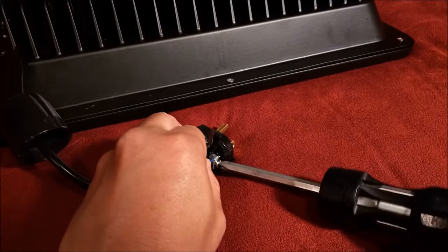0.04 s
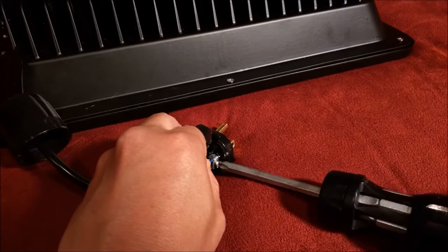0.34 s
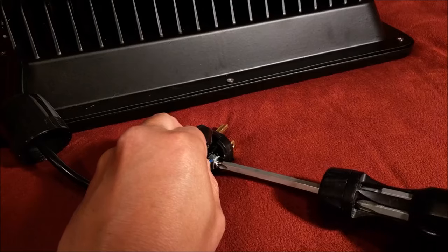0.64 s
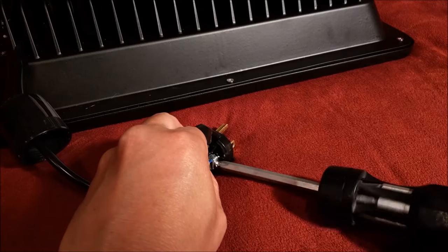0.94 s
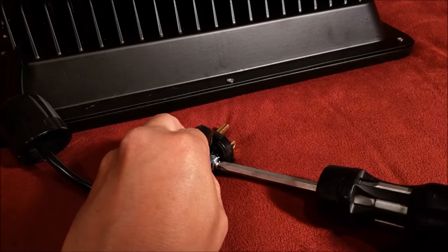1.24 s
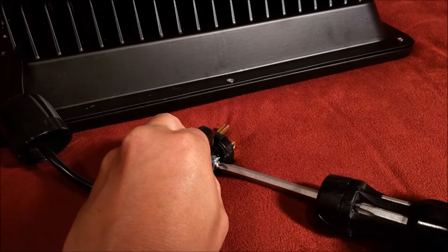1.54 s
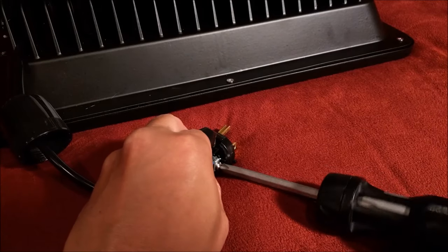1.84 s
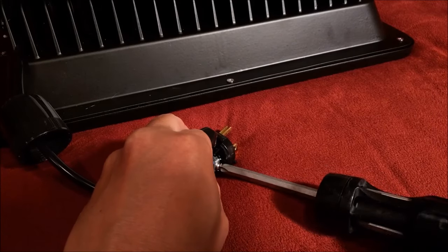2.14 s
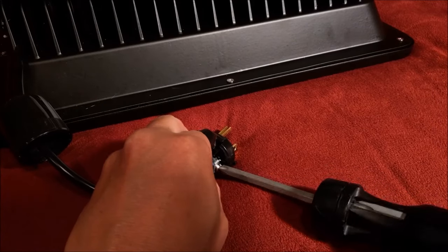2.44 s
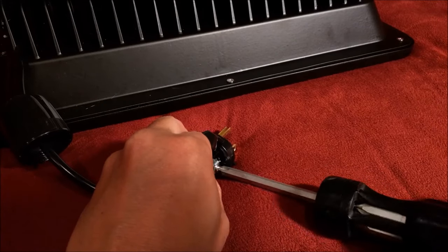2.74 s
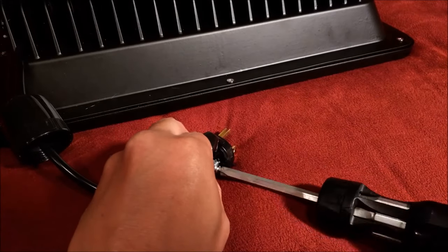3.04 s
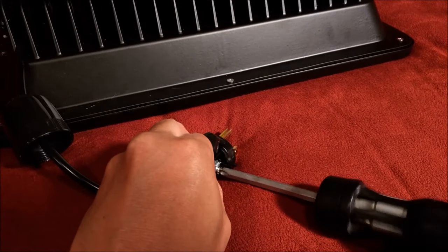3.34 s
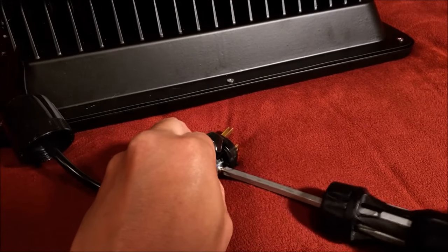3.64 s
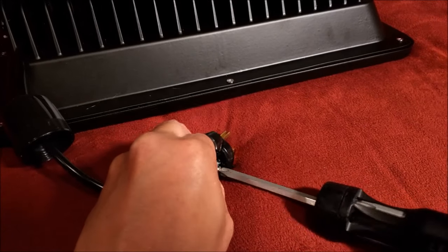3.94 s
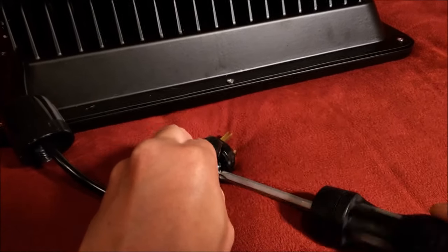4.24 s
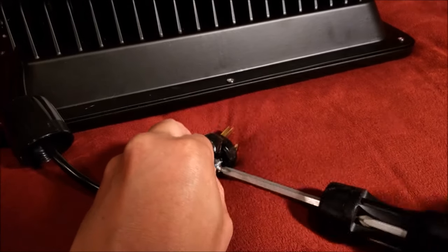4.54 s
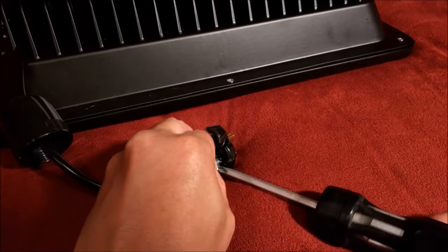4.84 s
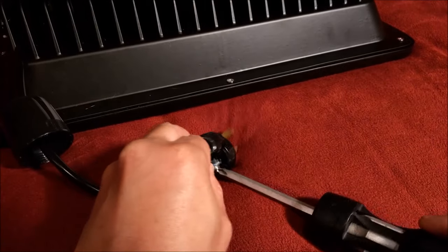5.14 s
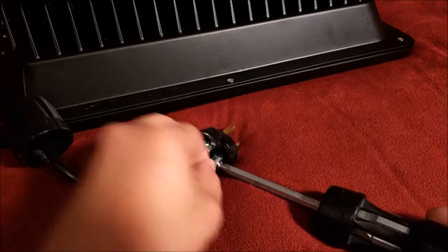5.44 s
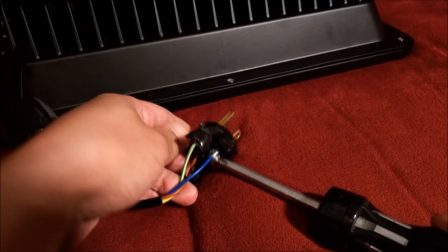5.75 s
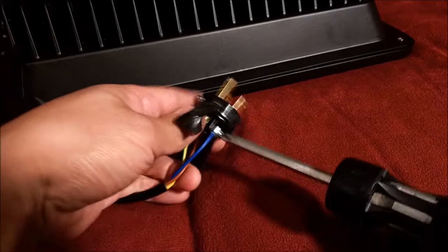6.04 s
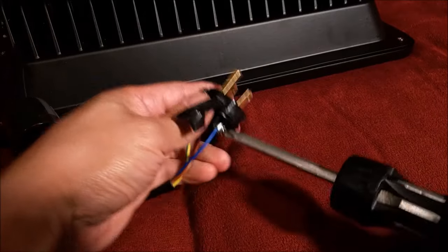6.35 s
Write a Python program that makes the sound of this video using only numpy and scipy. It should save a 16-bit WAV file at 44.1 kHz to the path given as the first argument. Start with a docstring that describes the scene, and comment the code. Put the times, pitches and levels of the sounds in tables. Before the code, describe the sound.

Clusters of small, sharp ticks as a screwdriver slips in an electrical plug's screw, with dull hand bumps in a quiet room.

```python
"""A small quiet room, a blanket-covered table: close up, a screwdriver works a plastic plug's terminal screw.
The blade knocks and slips in the slot: clusters of dry clicks from the shell, with a faint ring of steel. The
turning hand bumps the table four times, two of the bumps knocking again on the rebound; fingers pat and rub,
and the thread squeaks thinly. Low rumble and steady hiss lie underneath."""
import sys
import numpy as np
from scipy import signal
from scipy.fft import rfft, irfft
from scipy.io import wavfile
from scipy.ndimage import uniform_filter1d

SR = 44100
rng = np.random.default_rng(int(sys.argv[2]) if len(sys.argv) > 2 else 0)


def store_wav(level_fs):
    """Save 16-bit WAV to argv[1]."""
    pcm = np.round(np.clip(np.atleast_2d(level_fs), -1, 1) * 32767)
    wavfile.write(sys.argv[1], SR, pcm.T.astype(np.int16))


N = 281358
TIME = np.arange(N) / SR


# blade knocks in the slot: t/s, level/dB, hardness/dB, chatter t60/s, favoured f/Hz
BLADE_KNOCKS = [(.0447, -49, -2, 0.021, 4230), (0.1178, -53.5, 0, .024, 1560), (0.124, -54, -5, .014, 3960),
                (0.1358, -39, 1.5, 0.014, 7500), (0.2254, -51.5, -18, 0.011, 4100),
                (0.2314, -52, -16, 0.028, 4150), (.652, -51, -11, .015, 2380),
                (.664, -40.5, -4, .022, 6140), (1.1732, -48, 6.5, 0.026, 4400),
                (1.5838, -48, -8, 0.014, 2400), (1.5877, -40.5, -3, 0.021, 6340),
                (1.6734, -62, -1, 0.019, 1570), (1.8138, -71, -7, .01, 1650),
                (1.8906, -70.5, -2, 0.017, 1620), (1.977, -64, -6, 0.023, 1600), (2.146, -74, 0, .02, 1740),
                (2.2606, -71, -4, .04, 1500), (2.6357, -62, -6, 0.017, 3190), (2.6613, -42, 4, 0.025, 7560),
                (2.6706, -40.5, 5, 0.019, 4200), (2.7172, -52, 2, 0.02, 4200),
                (2.7789, -54.5, 1, 0.041, 1880), (2.8667, -48, -1, .017, 5300),
                (2.9456, -52, -1, .029, 7500), (2.965, -59.5, -3, .02, 1470),
                (3.0847, -65.5, 3.5, .04, 1650), (3.0932, -50.5, 5, 0.022, 3930),
                (3.1783, -48, 14.5, 0.0091, 10900), (3.2159, -53.5, -3, 0.012, 2320),
                (3.2528, -53, 3.5, 0.014, 3940), (3.3267, -61.5, 7, 0.027, 2200),
                (3.361, -61, 2, 0.023, 1570), (3.3737, -37, 4.5, 0.015, 6800),
                (3.3797, -39, 0, 0.018, 4200), (3.4141, -44.5, 1.5, 0.032, 4370),
                (3.4392, -55, -1, .02, 3900), (3.4526, -45.5, -16, .014, 4300),
                (3.6019, -44.5, -3, 0.012, 2520), (3.6256, -57, -12, .01, 1660),
                (3.714, -57, 0, 0.024, 2350), (3.8112, -49, -8, 0.014, 4100),
                (3.8731, -59.5, -8, 0.018, 2450), (3.987, -57.5, -2, .03, 2320),
                (3.9986, -57, -11, .016, 2340), (4.0103, -51.5, -16, 0.0097, 1670),
                (4.184, -62.5, 9, .03, 2490), (4.2197, -46, -1.5, 0.023, 3360),
                (4.2733, -60.5, -13, .02, 2500), (4.3404, -56, 6, .022, 5900),
                (4.4305, -46, 2, 0.025, 2404), (4.5192, -48, -1, 0.0087, 6300),
                (4.6, -69, -18, 0.034, 1728), (4.6699, -56.5, 5, .014, 2990),
                (4.6985, -52, -12, .021, 2380), (4.7219, -49, -15, .027, 1570),
                (4.7438, -53, -8, .036, 2400), (4.7483, -41.5, 3, 0.029, 4170),
                (4.8148, -56.5, 10.5, 0.018, 6040), (4.9753, -62, 0, .014, 1810),
                (4.9851, -46, 0, .018, 4940), (5.2177, -52, -17, .014, 2480),
                (5.2367, -51.5, 4, 0.033, 2480), (5.2432, -44, 1, 0.023, 4200),
                (5.3101, -56, 6.5, .012, 6200), (5.3244, -57, -5, .012, 4200),
                (5.619, -63.5, -2, 0.048, 3050), (6.1146, -76.5, 38, 0.0054, 12500)]
# turns of the screw: start/s, end/s
SCREW_TURNS = [(1.6, 1.65), (3.051, 3.43), (3.68, 3.85), (4.03, 4.35), (4.52, 5.1)]
def screwdriver(rebound_s=.008, rebound_db=-13):
    """The blade knocks and drops back into the slot; the turning thread ticks faintly at random."""
    out = np.zeros(N)
    for s, db, *contact in BLADE_KNOCKS:
        add(out, s, knock(db, *contact))
        delay = rebound_s * np.exp(.25 * rng.normal())
        add(out, s + delay, knock(db + rebound_db, *contact))
    for start, end in SCREW_TURNS:
        for s in scatter(start, end, per_s=16):
            add(out, s, knock(db=rng.normal(-68.5, 2), hardness_db=0, t60=.019, favoured_hz=1680))
    return out


def knock(db, hardness_db, t60, favoured_hz, body_hz=2600, edge_hz=7500):
    """One slip: a snap and brief chatter drive the shell, and the steel rings on."""
    t = np.arange(SR // 4) / SR
    force = grainy_noise(len(t), spread_db=3) * fade(t, t60)
    force[0] += 1.93  # the snap
    force *= 1 - .46 * np.exp(-t / .00054)  # slightly softened attack
    shell = plug_shell(force, favoured_hz)
    body = band(shell, body_hz, "lowpass", order=4)
    # the small plug radiates little bass
    body = band(body, 730, "highpass", order=4) + undb(-6) * band(body, [200, 400], "bandpass")
    middle = band(shell, [body_hz, edge_hz], "bandpass", order=4)
    edge = band(shell, edge_hz, "highpass", order=4)
    # gentle or low contacts are mostly body; hard ones lift the top edge
    body_db = -1 + .2182 * (-50 - db) + 3.5 * np.log2(4000 / favoured_hz)
    layers = (body, body_db), (middle, 0), (edge, hardness_db - 10)
    attack = SR // 250  # the layers are balanced over their first 4 ms
    click = sum(undb(layer_db) * layer / np.std(layer[:attack]) for layer, layer_db in layers)
    return undb(db) * (click + steel_ring(t, favoured_hz))


# damped modes of the gripped plug and handle: f/Hz, width/Hz, level/dB
SHELL_MODES = [(302, 310, 3), (830, 350, -5), (1167, 470, 1), (1545, 440, 0), (1720, 320, -3.5),
               (2496, 236, -3), (3190, 710, 1), (3875, 210, 1), (4140, 250, 5), (5000, 920, -3),
               (6240, 260, -3), (6720, 106, -0.5), (7440, 1550, -3.5), (8810, 750, -2), (9830, 1200, -4.5),
               (10300, 800, -7), (12560, 490, -13.5), (12400, 570, -8)]
def plug_shell(force, favoured_hz, crack_db=-21):
    """The plastic colours the raw crack with short resonances, a little different on every hit."""
    out = undb(crack_db) * force
    for hz, width, db in SHELL_MODES:
        gain = undb(db + 10 * nearness(hz, favoured_hz) + 3 * rng.normal())
        out += gain * resonate(force, hz * rng.normal(1, .0077), width)
    return out


# modes of the steel blade and brass pins: f/Hz, level/dB, t60/s
METAL_MODES = [(2465, -26, .03), (3530, -37, .12), (3930, -29, .09), (4190, -23, .08), (5380, -32, .12),
               (6270, -23, .08), (6340, -30, .24), (7350, -26, .15), (12480, -34, .07), (13150, -28, .09),
               (13780, -32, .14)]
def steel_ring(t, favoured_hz, ring_db=-1.5):
    """Struck metal leaves a faint tail of decaying sines."""
    out = np.zeros(len(t))
    for hz, db, t60 in METAL_MODES:
        gain = undb(ring_db + db + 9 * nearness(hz, favoured_hz) + 3 * rng.normal())
        cycles = hz * rng.normal(1, .0019) * t + rng.random()
        out += gain * np.sin(2 * np.pi * cycles) * fade(t, t60)
    return out


def nearness(hz, favoured_hz):
    """Weight from 0 to 1: each contact point drives the modes near one frequency hardest."""
    return np.exp(-(np.log(hz / favoured_hz) / .097) ** 2)


# hand bumping the table, with two rebounds (3.383, 4.637): t/s, peak level/dB, push length/s
HAND_BUMPS = [(3.279, -27, 0.012), (3.383, -31.5, 0.029), (3.693, -21, 0.011), (4.085, -22.5, 0.0091),
              (4.554, -30.5, 0.014), (4.637, -33, 0.025)]
# table modes: f/Hz, level/dB, t60/s
TABLE_MODES = [(20.58, -4.5, 0.91), (33.2, 5.5, 0.15), (66, 3.5, 0.088), (90, -4, 0.14)]
def table_thuds():
    """Soft pushes through the blanket rock the table into deep thuds."""
    out, t = np.zeros(N), np.arange(SR) / SR
    modes = sum(undb(db) * np.sin(2 * np.pi * hz * t) * fade(t, t60) for hz, db, t60 in TABLE_MODES)
    for s, db, length in HAND_BUMPS:
        push = np.sin(np.pi * np.minimum(t / length, 1)) ** 2
        thud = band(signal.fftconvolve(modes, push)[:SR], 16.8, "highpass")
        add(out, s, undb(db) * thud / np.abs(thud).max())
    return out


# finger pads landing as the grip shifts: t/s, level/dB
GRIP_PATS = [(2.44, -49.5), (3.25, -50), (3.865, -51.5), (4.142, -51.5), (4.647, -48), (4.795, -49.5),
             (5.133, -51.5), (5.285, -50), (6.044, -52.5)]
def finger_pats(note_hz=225, jolt_db=-25, faint_db=-59.5):
    """Dull pats on the flesh-damped plug: grip shifts, a jolt at each table bump, faint random touches."""
    out, t = np.zeros(N), np.arange(SR // 10) / SR
    jolts = [(s, db + jolt_db) for s, db, _ in HAND_BUMPS]
    touches = [(s, faint_db) for s in scatter(0, N / SR, per_s=2.5)]
    for s, db in [*GRIP_PATS, *jolts, *touches]:
        note = np.sin(2 * np.pi * note_hz * np.exp(.14 * rng.normal()) * t)
        scuff = unit(band(rng.standard_normal(len(t)), [120, 450], "bandpass"))
        pat = (.81 * note + .82 * scuff) * fade(t, t60=.06)
        add(out, s, undb(db) * band(pat, 480, "lowpass"))
    return out


# skin sliding on the handle: centre t/s, length/s, level/dB
SKIN_RUBS = [(3.42, 0.097, -65), (3.745, 0.058, -62), (4.2, 0.21, -69), (4.68, 0.2, -69), (4.8, 0.3, -73),
             (5.19, 0.083, -68.5), (5.92, 0.23, -69)]
# wire and shell creaking under the fingers: centre t/s, length/s, level/dB
GRIP_CREAKS = [(1.49, 0.0046, -66), (4.66, .12, -72.5), (5.58, 0.027, -67), (5.732, 0.014, -71.5),
               (5.92, 0.24, -73.5), (6.19, 0.02, -71.5), (6.256, 0.016, -66.5)]
def finger_friction():
    """Sliding skin gives a grainy hiss over a low rustle; the gripped plug creaks in the mids."""
    grains = grainy_noise(N, spread_db=4)
    hiss = unit(band(grains, [3000, 14000], "bandpass", order=1))
    rustle = undb(-4) * unit(band(grains, [150, 450], "bandpass"))
    creak = unit(band(grains, [900, 2200], "bandpass"))
    return (hiss + rustle) * swells(SKIN_RUBS) + creak * swells(GRIP_CREAKS)


# thread squeaks: t/s, length/s, top f/Hz, level/dB
THREAD_SQUEAKS = [(.25, .28, 8550, -75), (1.93, 0.055, 8350, -74), (2.39, .24, 13200, -75)]
def thread_squeak(sag=.08):
    """The thread sticks and slips, singing a thin, unsteady note that arches with the speed of the turn."""
    out = np.zeros(N)
    for s, length, hz, db in THREAD_SQUEAKS:
        along = np.linspace(-1, 1, int(length * SR))
        waver = .003 * unit(uniform_filter1d(rng.standard_normal(len(along)), SR // 400))
        drift = .016 * unit(uniform_filter1d(rng.standard_normal(len(along)), SR // 25))
        pitch = hz * (1 - sag * np.abs(along) ** 3 + waver + drift)
        envelope = undb(db) * np.sqrt(1 - along ** 2)
        add(out, s, envelope * np.sin(2 * np.pi * np.cumsum(pitch) / SR))
    return out


def room_reverb(x, near_db=-15, tail_db=-16):
    """Sparse reflections from things on the table, then the weak tail of a small room."""
    t = np.arange(SR // 2) / SR
    sparse = rng.standard_normal(len(t)) * (rng.random(len(t)) < .04)
    dense = band(rng.standard_normal(len(t)), 17300, "lowpass", order=1)
    near = sparse * fade(t, t60=.08) * (t > .002)
    tail = dense * fade(t, t60=.41) * (t > .012)
    response = undb(near_db) * near / np.linalg.norm(near) + undb(tail_db) * tail / np.linalg.norm(tail)
    return signal.fftconvolve(x, response)[:N]


# spectrum of the room tone and hiss: f/Hz, relative level/dB
TONE_SPECTRUM = [(12, -13.5), (20, 0.5), (65, -2.5), (127, -13.5), (204, -20), (241, -16.5), (270, -19.5),
                 (310, -25), (873, -32.5), (1530, -35), (2200, -35.5), (2910, -35.5), (5080, -37),
                 (14700, -34.5), (16000, -40.5)]
# level of the low rumble, wandering with the hand's handling: t/s, level/dB
RUMBLE_LEVEL = [(0, 6.5), (.2, 2), (.9, 1), (1.2, -2.5), (2.3, -3), (2.7, 1), (4.6, 0.5), (5.3, 1.5),
                (6.38, 0.5)]
def room_tone(bed_db=-58, rumble_hz=170):
    """Slowly swelling rumble and steady hiss, with two faint narrow bands of brighter hiss."""
    hz, db = np.transpose(TONE_SPECTRUM)
    f = np.maximum(np.arange(N // 2 + 1) * SR / N, 1)
    colour = undb(np.interp(np.log(f), np.log(hz), db))
    bed = unit(irfft(rfft(rng.standard_normal(N)) * colour, N))
    # filtered both ways, so the rumble stays in phase with the bed
    rumble = band(band(bed, rumble_hz, "lowpass")[::-1], rumble_hz, "lowpass")[::-1]
    wander = undb(np.interp(TIME, *np.transpose(RUMBLE_LEVEL)))
    bed += rumble * (wander - 1)
    upper_hiss = undb(-82) * unit(resonate(rng.standard_normal(N), hz=9950, width=250))
    lower_hiss = undb(-85) * unit(resonate(rng.standard_normal(N), hz=3640, width=260))
    return undb(bed_db) * bed + upper_hiss + lower_hiss


def undb(db):
    """Decibels to gain."""
    return 10 ** (np.asarray(db) / 20)


def unit(x):
    """Scale to rms 1."""
    return x / np.sqrt(np.mean(x ** 2))


def add(out, s, sound):
    """Mix a sound in at time s."""
    i = max(int(s * SR), 0)
    out[i:i + len(sound)] += sound[:max(len(out) - i, 0)]


def band(x, hz, kind, order=2):
    """Butterworth filter."""
    return signal.sosfilt(signal.butter(order, hz, kind, fs=SR, output="sos"), x)


def resonate(x, hz, width):
    """One resonance, gain 1 at its centre."""
    return signal.lfilter(*signal.iirpeak(hz, hz / width, fs=SR), x)


def fade(t, t60):
    """Exponential decay, 60 dB down at t60."""
    return np.exp(-np.log(1000) * t / t60)


def swells(rows):
    """Smooth rise and fall around each (t/s, length/s, level/dB)."""
    return sum(undb(db) * np.exp(-2 * ((TIME - s) / length) ** 2) for s, length, db in rows)


def grainy_noise(n, spread_db):
    """Noise roughened by a random gain on every sample."""
    return rng.standard_normal(n) * undb(spread_db * rng.standard_normal(n))


def scatter(start, end, per_s):
    """Irregular moments between start and end: one anywhere in each equal slot."""
    count = max(int(round((end - start) * per_s)), 1)
    return start + (end - start) * (np.arange(count) + rng.random(count)) / count


def scene():
    """Tool and hands with a touch of room, over the table thuds and room tone, in mono."""
    work = screwdriver() + finger_pats() + finger_friction() + thread_squeak()
    return (work + room_reverb(work) + table_thuds() + room_tone())[None]


def record(dry):
    """A steep low-pass trims the top at 15.9 kHz."""
    return signal.sosfilt(signal.ellip(10, .2, 70, 15900, fs=SR, output="sos"), dry)


dry = scene()
out = record(dry)
store_wav(out)
```